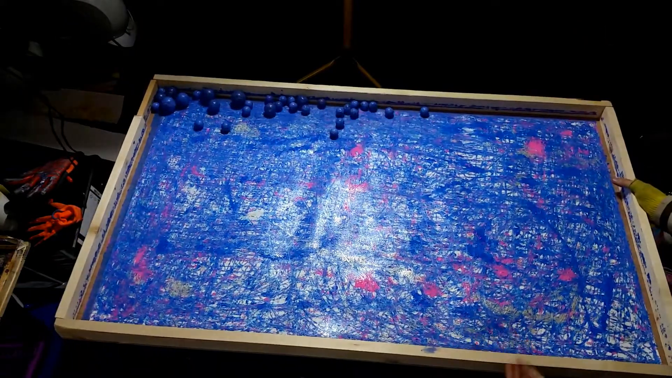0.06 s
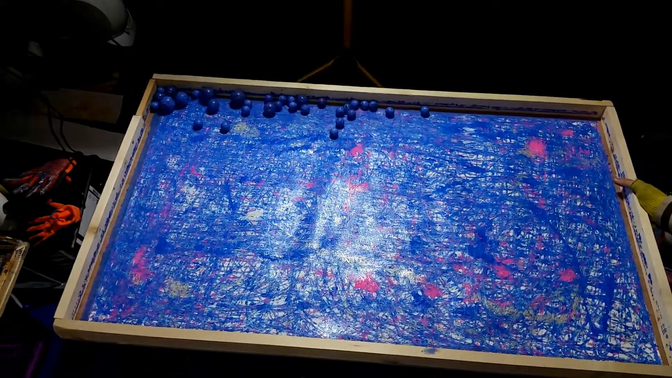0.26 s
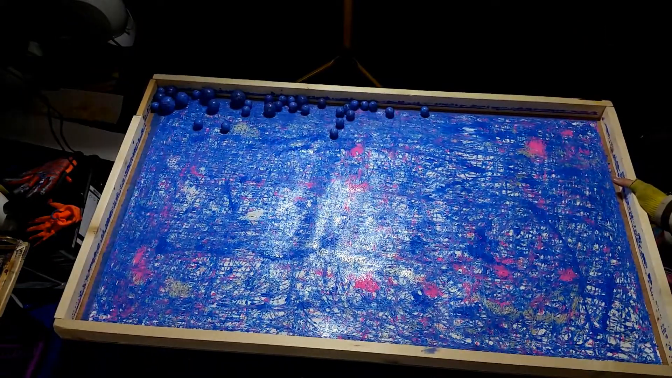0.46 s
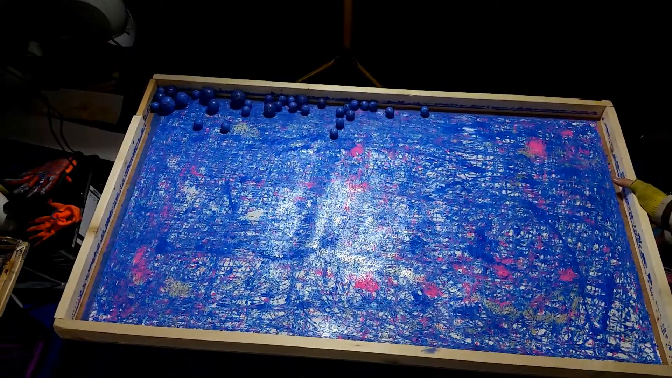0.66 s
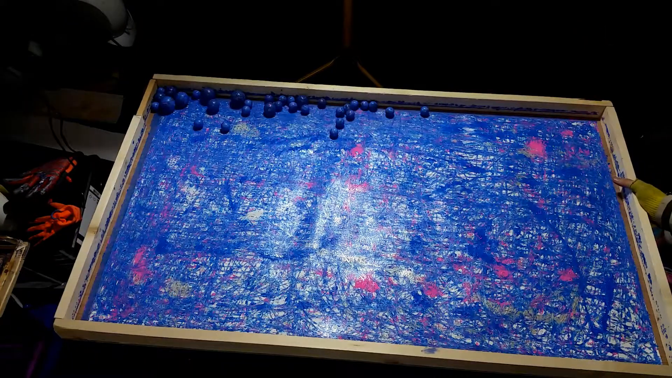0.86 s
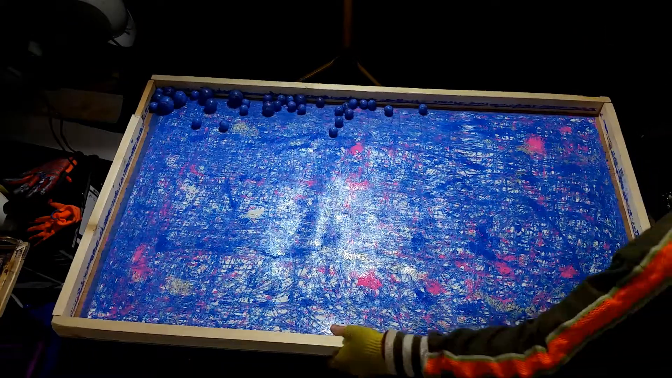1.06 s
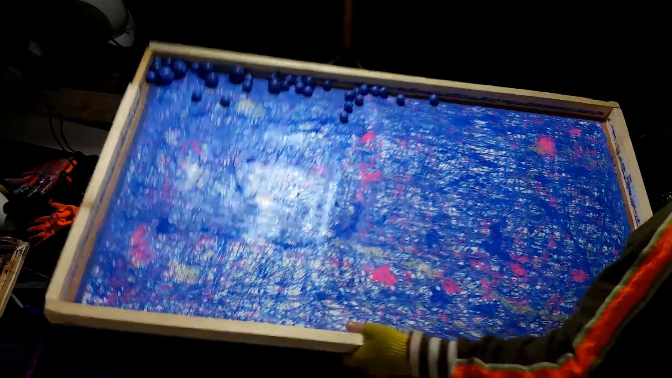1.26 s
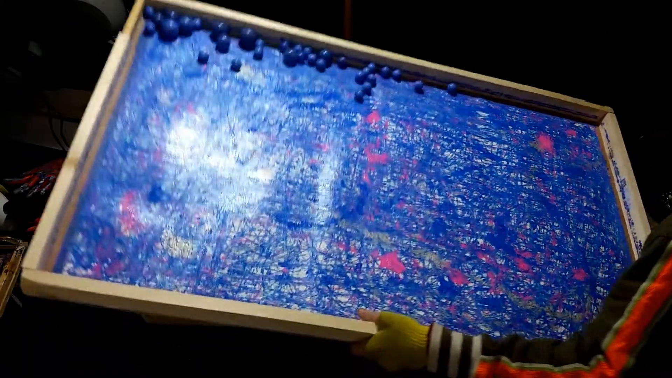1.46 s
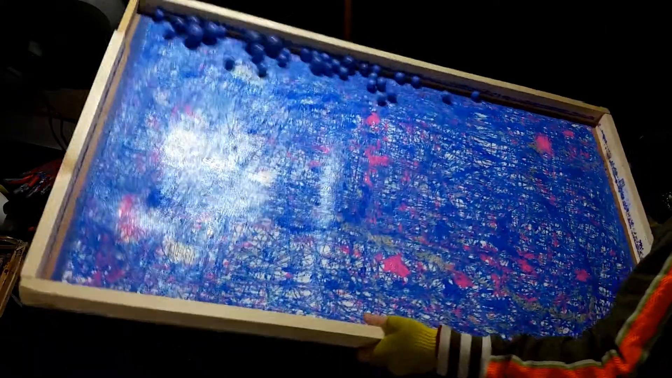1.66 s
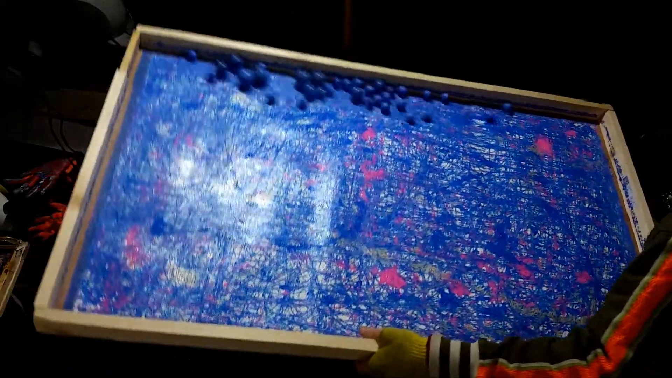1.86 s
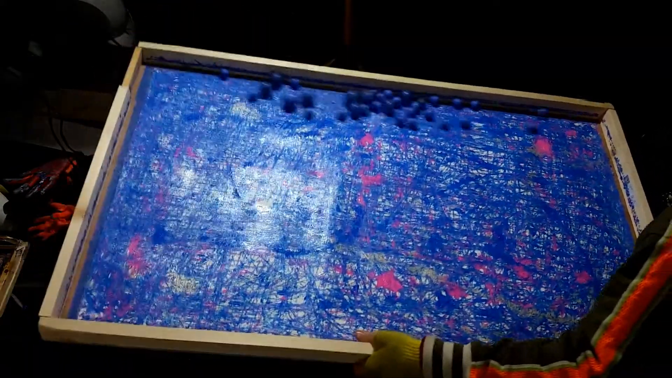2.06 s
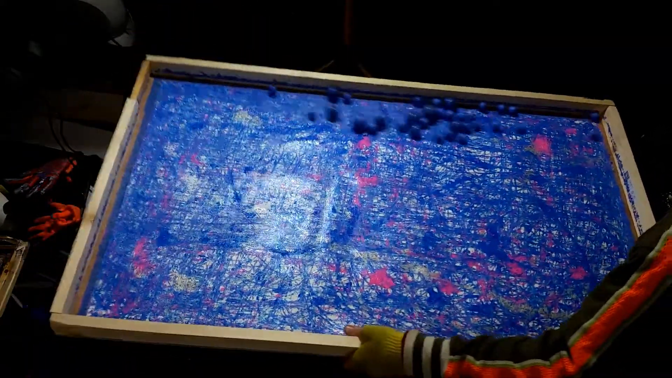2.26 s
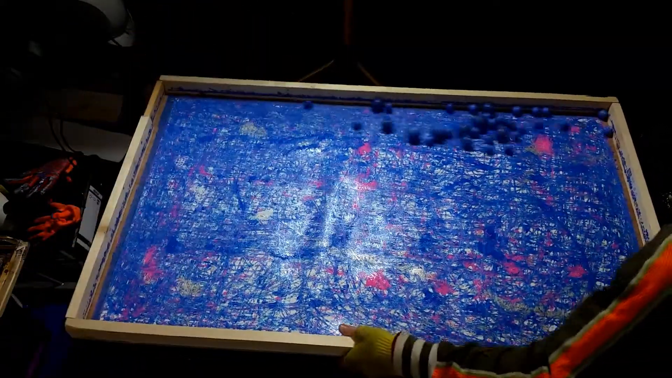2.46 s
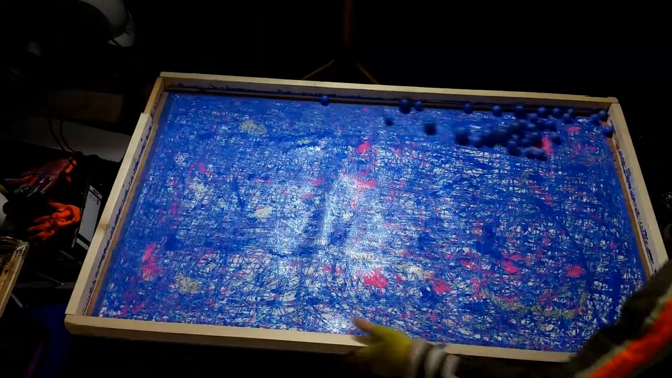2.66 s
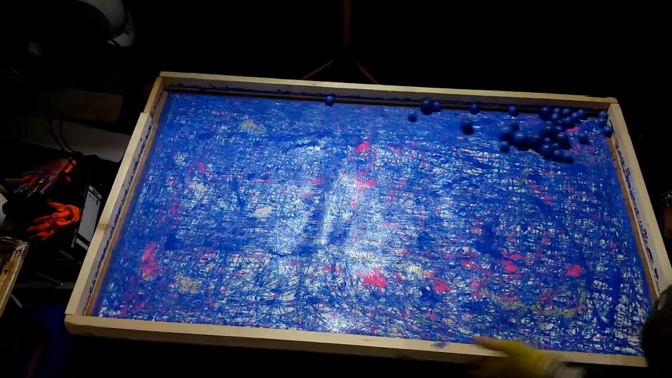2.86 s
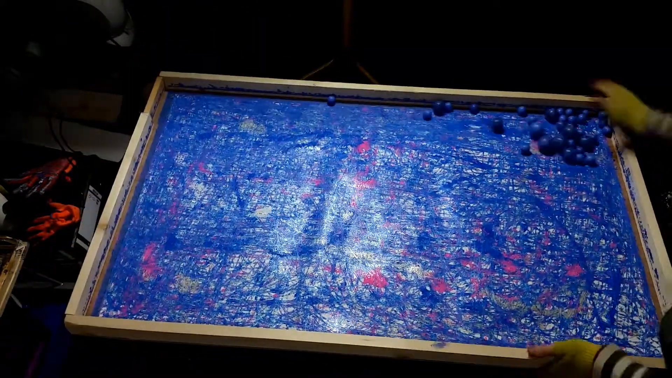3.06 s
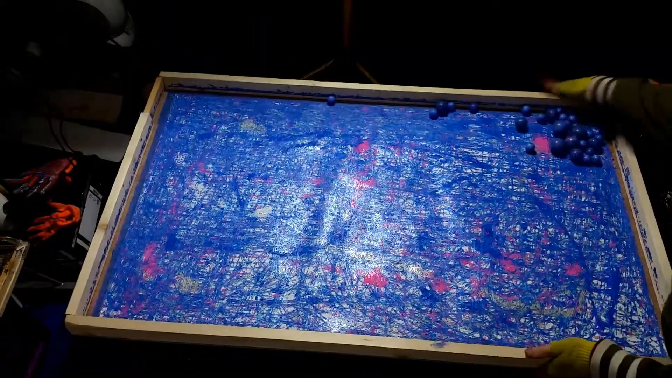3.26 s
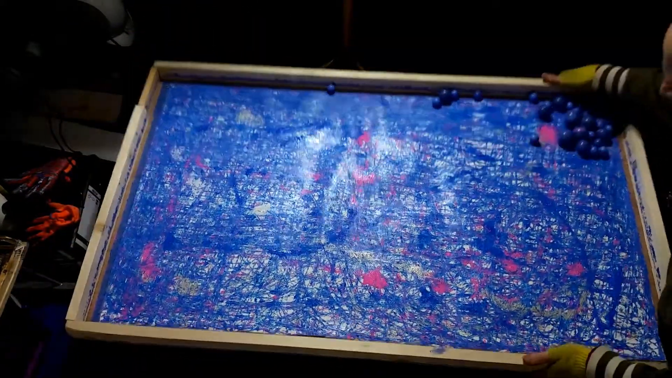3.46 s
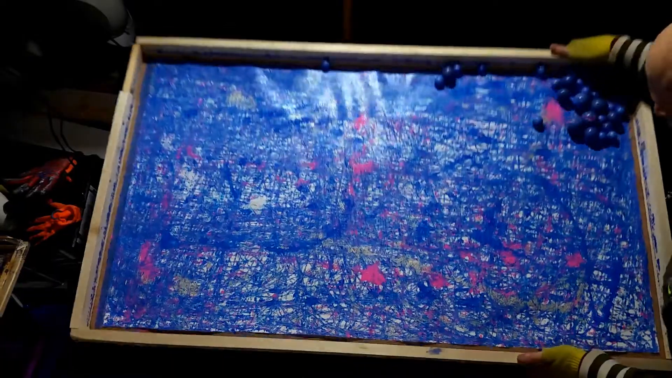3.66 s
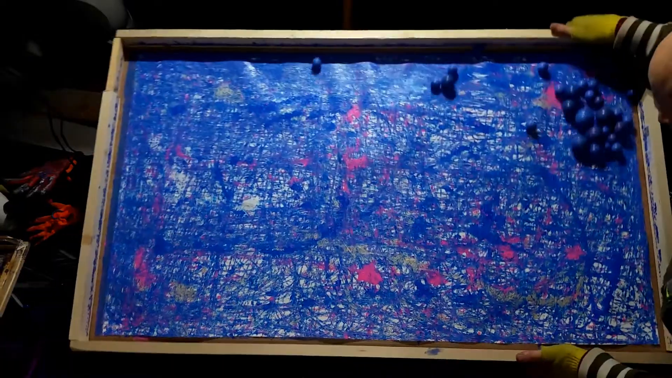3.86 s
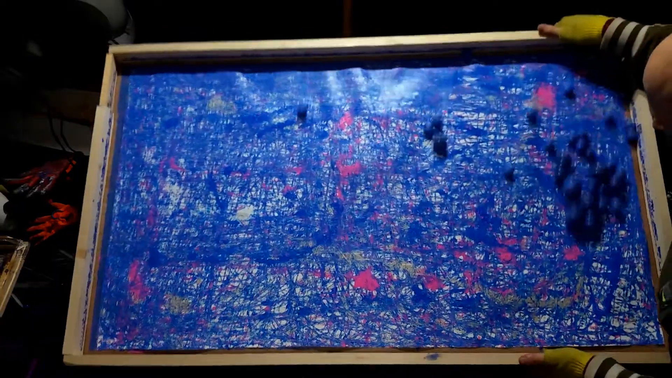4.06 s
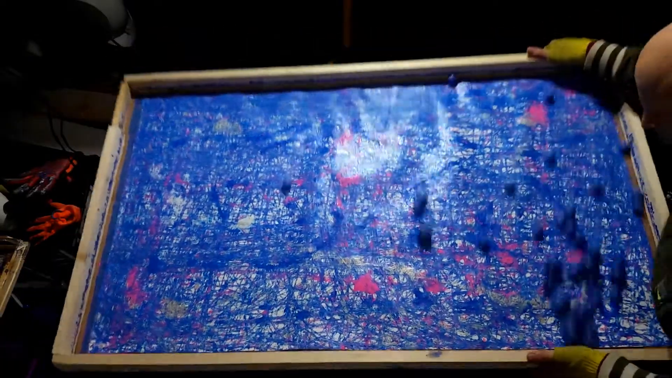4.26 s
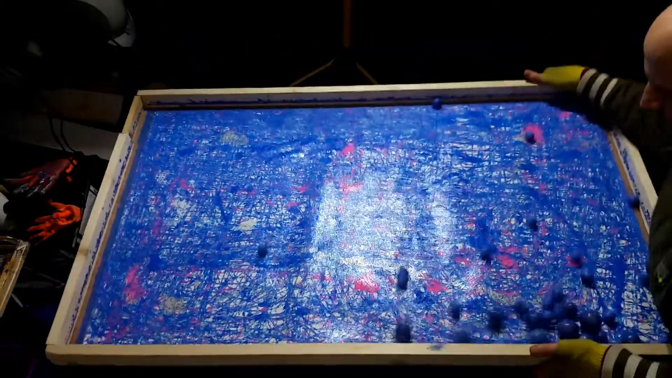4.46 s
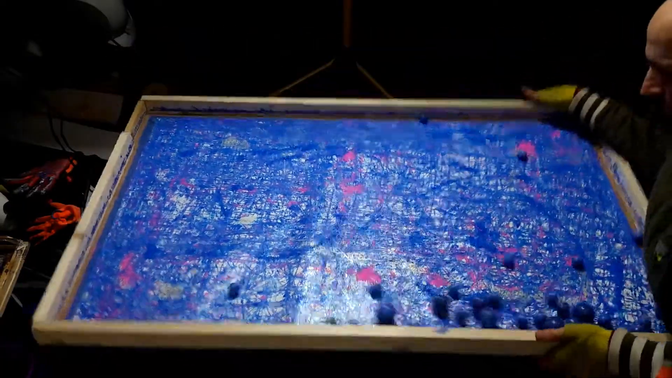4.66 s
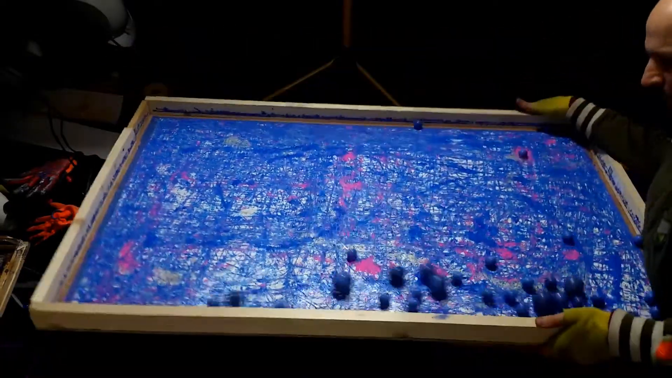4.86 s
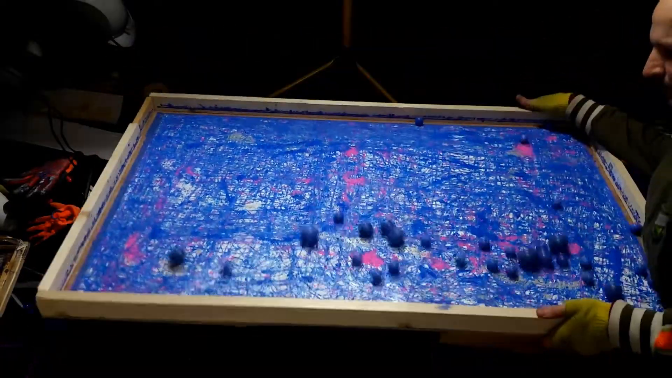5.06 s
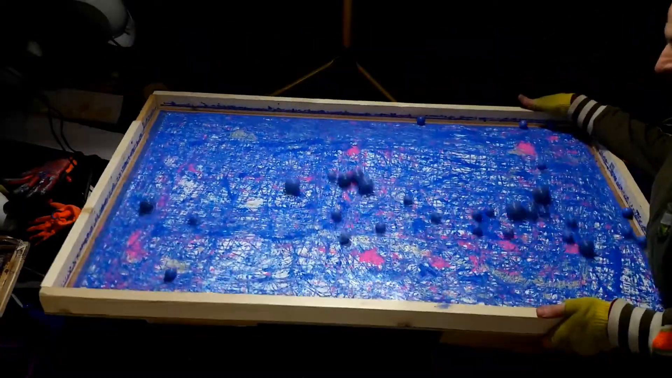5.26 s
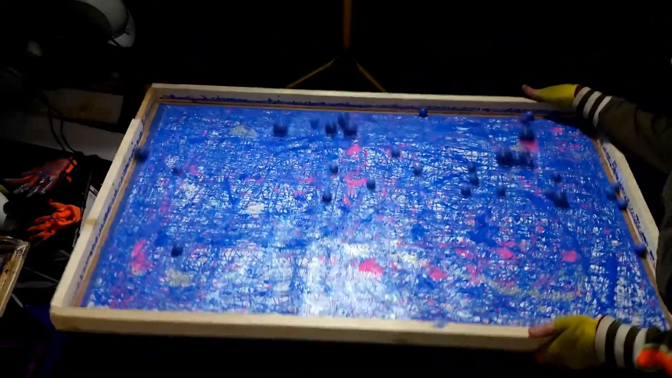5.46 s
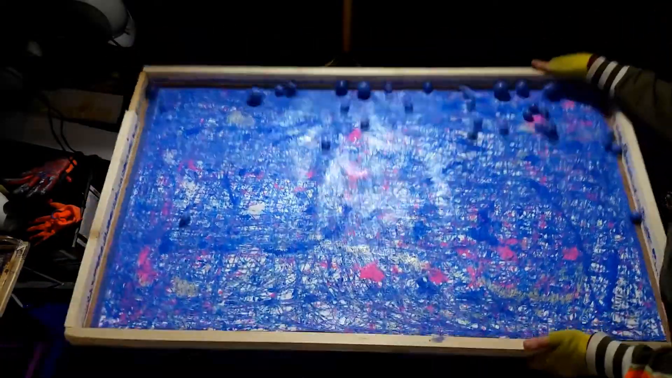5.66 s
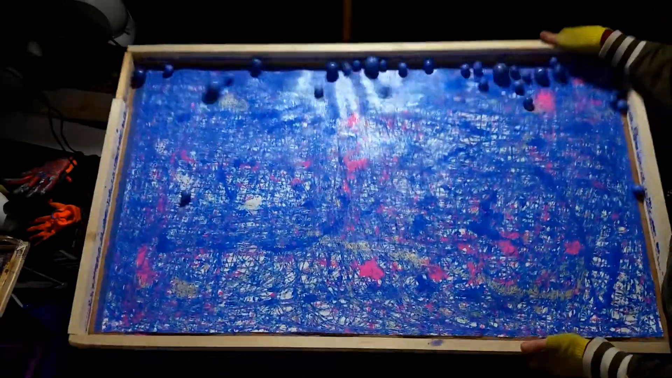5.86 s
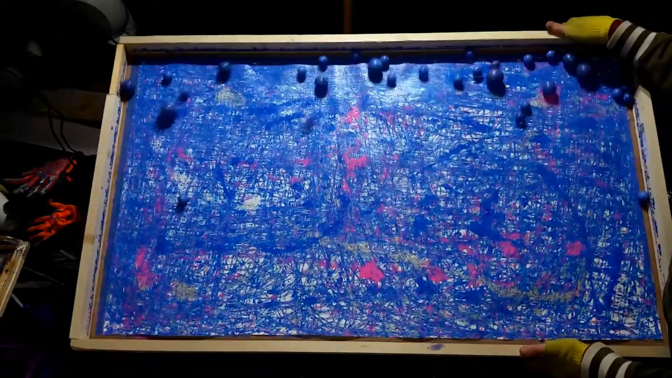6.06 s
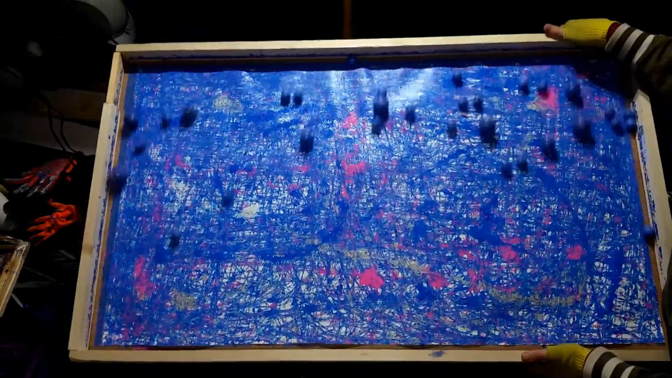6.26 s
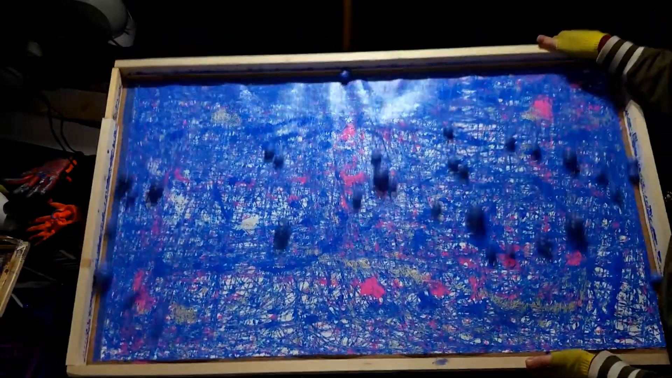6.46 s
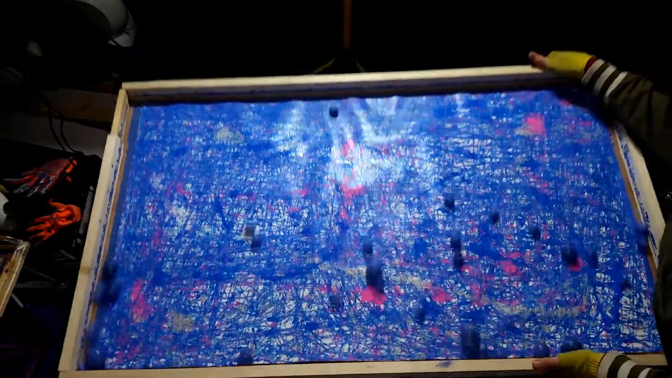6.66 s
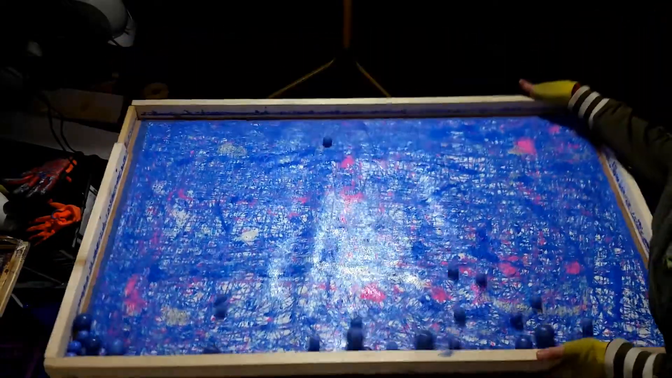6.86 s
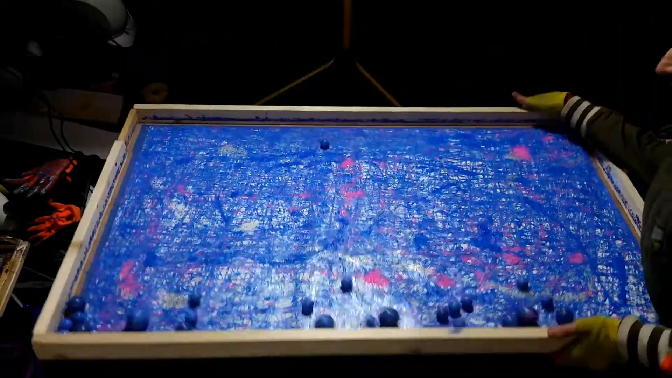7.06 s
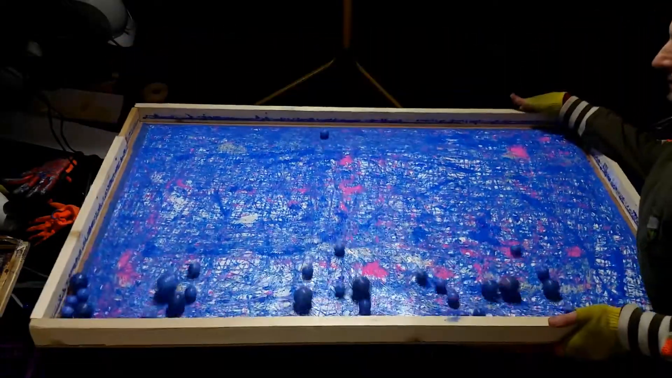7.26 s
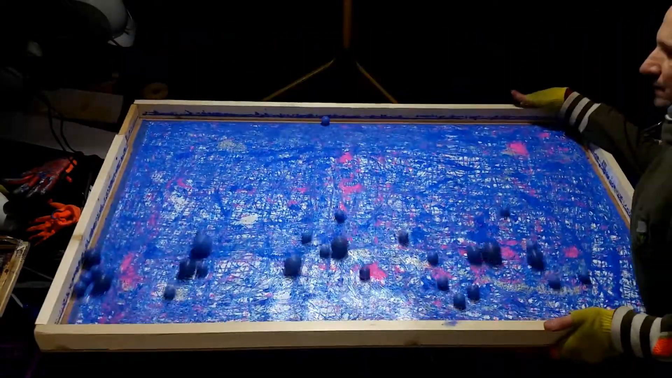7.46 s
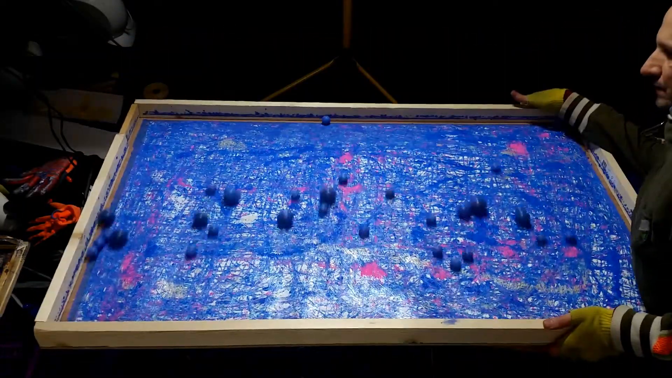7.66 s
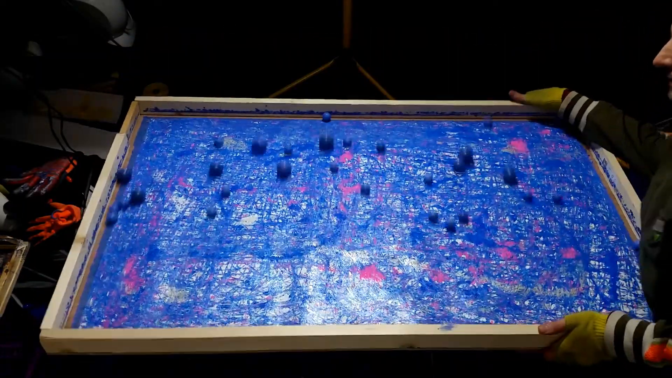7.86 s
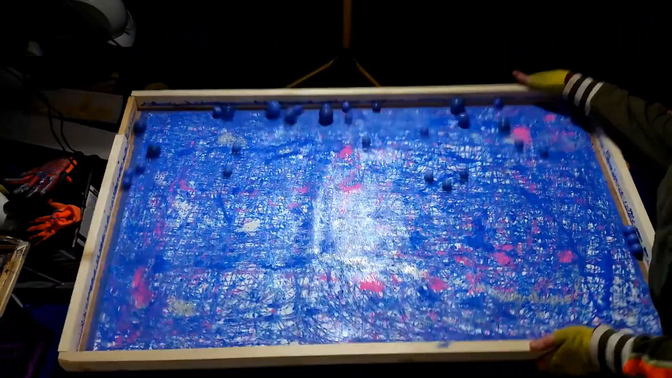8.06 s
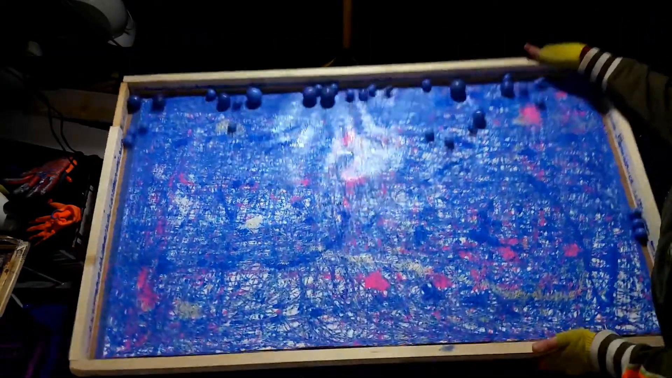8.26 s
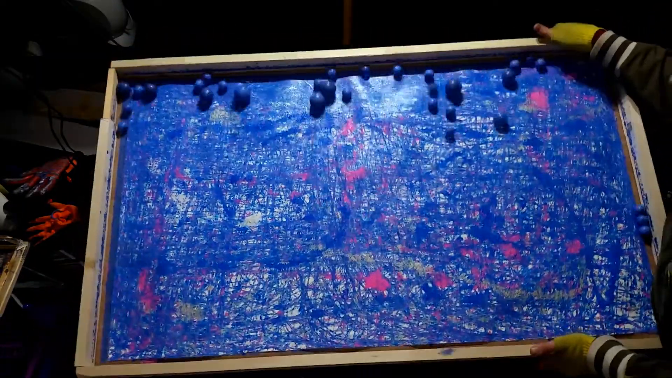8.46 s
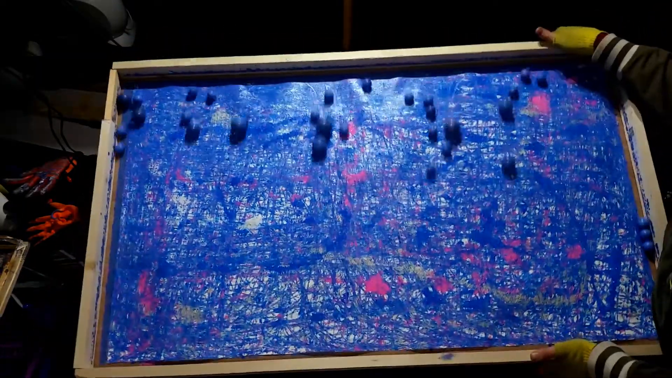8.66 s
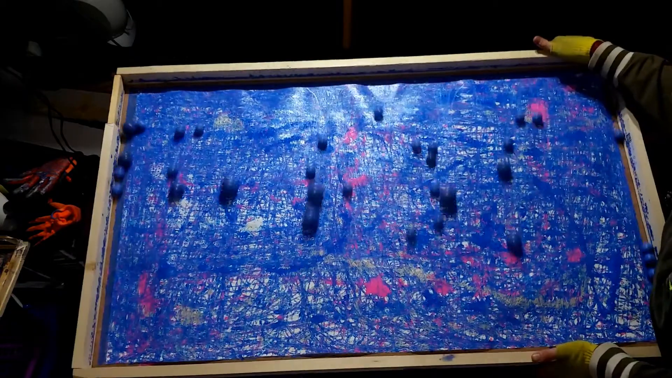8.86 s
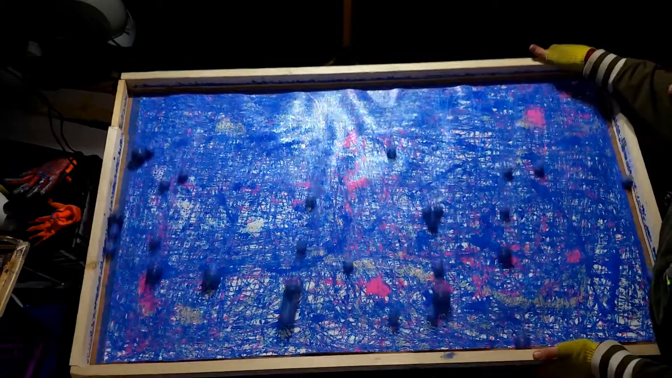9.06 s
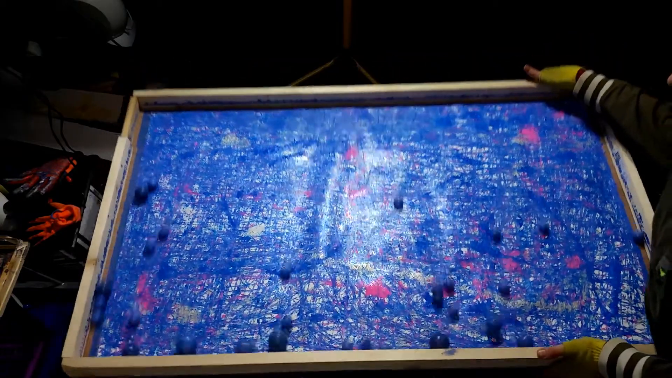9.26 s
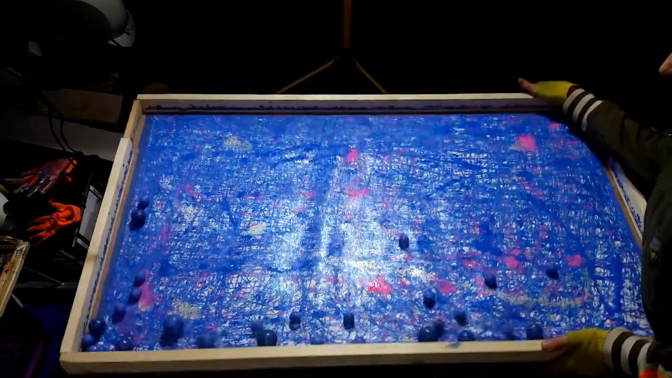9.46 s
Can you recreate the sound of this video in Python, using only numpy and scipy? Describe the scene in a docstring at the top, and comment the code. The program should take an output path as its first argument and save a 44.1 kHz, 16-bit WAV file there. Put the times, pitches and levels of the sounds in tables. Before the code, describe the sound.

Glass marbles roll in rumbling waves across a big wooden tray, clattering hard against its rails with each tilt in a small room.

```python
"""Marbles in a tipping wooden tray

Glass marbles roll over wet painted paper in a large hanging wooden tray, tipped to and fro in a small room.
Board modes jolted at random rumble; struck rail modes knock; short sine clicks clack, glass on glass.
The board's lowest mode booms now and then, mostly around the landings; once the board slaps its stop.
One microphone hears it direct and through the room's ring, over a faint hum and a band of hiss.
"""
import sys
import numpy as np
from scipy import signal
from scipy.fft import rfft, irfft
from scipy.io import wavfile

SR = 44100
rng = np.random.default_rng(int(sys.argv[2]) if len(sys.argv) > 2 else 0)


def waveform_to_disk(signal):
    """Save audio, clipped to [-1, 1], as 16-bit WAV at the path in sys.argv[1]."""
    frames = np.transpose(np.atleast_2d(signal))
    scaled = np.clip(frames, -1, 1) * 32767
    samples = np.round(scaled).astype(np.int16)
    wavfile.write(sys.argv[1], SR, samples)


N = 419832

# Levels in the tables are relative: the mix trims each layer.
# room noise spectrum: (f/Hz, level per Hz/dB)
AIR_SPECTRUM = [(12, -21), (20, 11.5), (45, -25), (81, -33.5), (116, -16.5), (248, -21), (527, -22),
                (607, -22), (873, -27), (1120, -22.5), (2390, -34), (4420, -19.5), (5530, -29.5),
                (14700, -38), (16000, -47.5)]
# rumble of the rolling crowd, swelling on each tip and sinking once it lands: (t/s, level/dB)
ROLL_LEVEL = [(0, -79.5), (1.5, -68), (1.95, -44.5), (2.28, -42), (2.6, -41), (3.1, -56.5), (3.9, -62.5),
              (4.3, -45.5), (4.74, -42), (5.12, -52), (5.67, -43.5), (5.96, -53.5), (6.25, -52),
              (6.5, -48.5), (6.89, -37.5), (7.21, -59.5), (7.45, -56), (8.2, -36), (8.46, -59),
              (8.66, -53.5), (9.3, -43.5), (9.52, -46)]
# modes of the board under the rolling marbles: (f/Hz, width/Hz, level/dB)
BOARD_MODES = [(128.3, 9.6, 1), (147, 47, -3), (179.5, 19.4, 2.5), (251, 18.3, -7), (299, 28, -5.5),
               (367, 54, -3), (420, 105, -2.5), (544, 96, -6.5), (700, 94, -9), (1000, 780, -10),
               (1680, 720, -19), (2300, 620, -68)]
# the tray jolts as it swings back and the board booms: (t/s, level/dB)
BOOM_EVENTS = [(1.05, -52.5), (2.55, -41), (4.53, -41), (4.81, -28), (5.04, -35.5), (5.7, -31), (6.47, -49),
               (6.92, -28.5), (8.19, -28), (9.44, -38)]
# the crowd piles up on a rail: (t/s, length/s, rail patter level/dB, glass patter level/dB)
LANDING_EVENTS = [(2.005, 0.37, -56, -58.5), (4.45, 0.2, -39.5, -40.5), (4.794, 0.15, -43.5, -61),
                  (5.629, 0.2, -30, -41.5), (6.452, 0.15, -44.5, -70), (6.689, 0.27, -28.5, -44),
                  (8.112, 0.2, -31.5, -41), (8.862, 0.44, -49.5, -84), (9.236, 0.33, -33, -43.5)]
# modes of the rails: (f/Hz, near rail level/dB, far rail level/dB, t60/s)
RAIL_MODES = [(183.1, -12.5, -14.5, 0.18), (275, -15.5, -13.5, 0.12), (346.5, -11, -15, 0.088),
              (421.3, -11, -7, 0.15), (560, 1, 0.5, 0.028), (643, -13, -6.5, 0.074),
              (683, -4.5, 0.5, 0.027), (725.6, -10, 0.5, 0.044), (894, -4.5, -7, 0.04),
              (985, -8.5, -3.5, 0.054), (1080, -1, 5.5, 0.025), (1215, -3.5, -2, 0.031),
              (1349, -0.5, 1, 0.018), (1522, -2, -3, 0.028), (1740, -4, -2, 0.024), (1904, -5.5, -8, 0.046),
              (2140, -3.5, -4.5, 0.022), (2460, -9.5, -37.5, 0.035), (2820, -13, -17, 0.038),
              (3370, -40, -50.5, .03)]
# spans with the marbles gathered at the far rail: (start t/s, end t/s)
FAR_RAIL_SPANS = [(3.2, 3.6), (5.25, 6.2), (7.9, 8.7)]
# hands shift on the frame: (t/s, peak level/dB, favoured f/Hz, hardness/dB)
GRIP_EVENTS = [(0.344, -52.5, 275, -5), (0.947, -51.5, 176, 1), (1.035, -54, 330, -17),
               (1.144, -50.5, 185, -8), (1.218, -47, 248, -2), (1.279, -54, 196, 22)]
# marble on rail: (t/s, peak level/dB, f/Hz favoured by the spot struck, hardness/dB)
KNOCK_EVENTS = [(1.544, -42, 763, -1.5), (1.753, -31, 531, -32), (1.849, -22.5, 710, 16.5),
                (1.994, -28, 1080, 31), (2.086, -29.5, 344, -21), (2.115, -32, 447, 16),
                (2.187, -28.5, 444, 14), (2.272, -28, 1153, 22), (2.37, -30, 479, 9), (2.439, -28, 400, -1),
                (2.572, -27.5, 355, 0.5), (2.674, -34.5, 353, 20), (2.713, -33, 720, -16),
                (3.009, -42.5, 406, 2), (3.298, -32.5, 752, -9), (4.143, -33.5, 930, -17),
                (4.403, -7.5, 542, 3), (4.428, -18.5, 914, 10), (4.475, -9.5, 690, 7),
                (4.529, -22, 572, -1), (4.609, -10.5, 985, 27.5), (4.717, -27, 985, -1),
                (4.804, -16, 356, 3), (4.879, -34, 398, -12), (4.999, -18.5, 490, -4),
                (5.039, -30.5, 1000, -1), (5.333, -22, 700, -1.5), (5.48, -37, 1180, -12),
                (5.527, -23.5, 910, 0), (5.571, -25.5, 700, -1), (5.597, -15, 725, 1), (5.616, -7, 664, 1),
                (5.654, -8, 646, -6), (5.758, -14, 700, 4), (5.789, -24, 432, -11), (5.857, -17.5, 640, 16),
                (5.924, -30, 700, -1), (5.985, -24, 686, -2), (6.049, -28.5, 700, 19),
                (6.382, -19.5, 337, -9.5), (6.465, -28, 410, -3), (6.487, -29.5, 880, 13),
                (6.651, -16, 523, 1), (6.693, -12, 420, 18), (6.725, -7, 980, 21), (6.775, -5, 560, 4.5),
                (6.809, -11.5, 560, 8.5), (6.896, -16.5, 560, 17), (6.924, -12, 976, 25.5),
                (6.989, -17, 553, 3.5), (7.087, -22, 1290, -5.5), (7.129, -32.5, 1000, 2),
                (7.449, -39, 340, -29), (7.493, -29, 835, -3.5), (7.993, -18.5, 700, 8.5),
                (8.048, -17.5, 710, -25), (8.086, -9, 420, 9), (8.117, -9.5, 376, -1.5),
                (8.179, -10, 395, -1), (8.197, -14.5, 390, 4), (8.24, -13, 1040, -13),
                (8.331, -22, 360, 16), (8.367, -22.5, 630, 1), (8.409, -22.5, 906, -5.5),
                (8.837, -34, 1220, -14), (8.891, -32.5, 346, 1), (9.079, -32.5, 430, -8),
                (9.189, -13.5, 1220, -9), (9.241, -7.5, 560, 4.5), (9.265, -7, 1010, -4),
                (9.334, -11.5, 624, -7), (9.373, -13.5, 563, 3), (9.489, -17.5, 1154, 5)]
# marble on marble: (t/s, level/dB, f/Hz)
CLACK_EVENTS = [(1.579, -42, 5120), (1.719, -35.5, 4700), (1.8058, -35, 4840), (1.908, -31, 6600),
                (2.126, -30, 5360), (2.452, -36, 2980), (2.65, -37, 5650), (2.781, -35, 4930),
                (2.9655, -38.5, 4160), (3.005, -37, 4170), (3.2926, -34, 6240), (3.3807, -44, 5550),
                (3.425, -43.5, 3040), (3.8168, -42.5, 3660), (4.0122, -43, 3700), (4.2, -44, 4800),
                (4.4051, -21, 4200), (4.427, -21.5, 8550), (4.444, -18.5, 9700), (4.468, -18, 9050),
                (4.606, -29, 3480), (4.53, -35, 11000), (4.597, -26, 8900), (4.706, -24, 11000),
                (4.804, -26.5, 3180), (4.9997, -33.5, 2840), (5.0786, -42.5, 7100), (5.1493, -44.5, 5270),
                (5.352, -37, 6250), (5.459, -39, 3540), (5.539, -36, 5010), (5.5693, -32, 8350),
                (5.6143, -15.5, 4950), (5.685, -15, 2960), (5.8106, -50, 7000), (5.897, -35, 8500),
                (5.9724, -38, 9500), (6.052, -41, 4030), (6.41, -43.5, 6560), (6.434, -37, 8350),
                (6.4955, -34.5, 9010), (6.645, -32.5, 6560), (6.693, -24, 3250), (6.7149, -14.5, 3370),
                (6.788, -25, 6500), (6.8862, -17.5, 3050), (6.9208, -11.5, 2690), (7.0442, -30.5, 8800),
                (7.0696, -26.5, 5250), (7.202, -30, 10400), (7.991, -46, 3140), (8.0474, -7.5, 3230),
                (8.1409, -28, 3800), (8.192, -28, 6000), (8.215, -20, 10000), (8.3006, -31, 8880),
                (8.4255, -27.5, 6500), (8.6021, -34.5, 7660), (8.641, -37, 4470), (9.2549, -15.5, 3300),
                (9.315, -25, 8400), (9.465, -25, 8540), (9.491, -25, 2940)]
# a marble drops off a ridge onto the board: (t/s, peak level/dB)
BUMP_EVENTS = [(1.856, -23.5), (2.237, -24.5), (2.294, -21.5), (2.443, -20), (2.517, -35), (4.411, -25),
               (4.609, -18.5), (4.808, -10.5), (5.276, -28.5), (6.379, -30), (6.651, -27), (6.806, -18),
               (6.894, -27), (8.12, -26), (8.166, -20), (8.331, -24.5), (8.734, -29.5), (9.074, -24)]
# decay of the room's tail: (f/Hz, t60/s)
ROOM_DECAY = [(200, 0.3), (1000, 0.38), (4000, 0.2), (12000, 0.31)]

AIR_DB = -62
HUM_HZ, HUM_DB = 118, -74
BRIGHT_AT_DB, BRIGHT_PER_DB = -46, 0.1892   # louder rolling is brighter: dB an octave per dB above this level
LANDING_BRIGHT_DB = 2.5   # dB an octave added while the crowd lands
LUMPY_DB = 2.5   # spread of the surges as marbles cross ridges of paint
BOOM_HZ, BOOM_WIDTH_HZ = 51, 11
BOOM_RISE_DB_PER_S, BOOM_FALL_DB_PER_S, BOOM_REST_DB = 404, 72, -61.5
GATHER_DB_PER_S, SCATTER_DB_PER_S = 501, 138
RAIL_UNDER_ROLL_DB, GLASS_UNDER_ROLL_DB, GLASS_REST_DB = -17, -25, -83   # stragglers between landings
KNOCK_RISE_S = 0.003
CRACK_DB, CRACK_T60_S, CRACK_HZ = -3, 0.077, (810, 3140)
BITE_DB, BITE_HZ, BITE_PER_HARD_DB = -14.5, (2240, 4160), 1.68   # shares the crack's t60
# hard clacks pass down a row of five more marbles; chatter is quieter for clacks below CHATTER_ABOVE_DB
CHATTER_GAP_S, CHATTER_DB, CHATTER_LOSS_DB = 0.006, -0.5, 4.6
CHATTER_SPREAD_DB, CHATTER_ABOVE_DB, CHATTER_SOFT_DB_PER_DB = 9, -35.5, 1.72
RATTLE_S, RATTLE_DB, RATTLE_GAP_S, RATTLE_LOSS_DB = 4.812, -12, 0.0165, 1
ROOM_DB, EARLY_DB, EARLY_T60_S, EARLY_RISE_S = 13, 10, 0.12, 0.0041   # dB against the direct sound
GLASS_TOP_HZ, GLASS_DIRECT_DB, WOOD_WET_DB = 11300, -6.5, 5.5
WIDE_DB, WIDE_HZ = -13, 9500
OVERLOAD_TOP = 0.35   # full scale is 1
CUTOFF_HZ = 16000


def amp(db):
    """Decibels to amplitude."""
    return 10 ** (np.asarray(db) / 20)


def rms_one(x):
    """Scale to an RMS of 1."""
    return x / np.sqrt(np.mean(x ** 2) + 1e-20)


def at_hz(points, hz):
    """Read a curve of (f/Hz, value) along log frequency."""
    point_hz, values = np.transpose(points)
    return np.interp(np.log(hz), np.log(point_hz), values)


def convolve(x, response):
    """Convolve and trim to the scene's length."""
    return signal.fftconvolve(x, response)[:N]


def band_pass(x, edges_hz):
    """Keep one band of x, between two edges in Hz."""
    return signal.sosfilt(signal.butter(2, edges_hz, "band", fs=SR, output="sos"), x)


def drift(rate_hz):
    """Smooth chance of RMS 1: noise through two equal low-pass poles, at a fortieth of SR."""
    r = np.exp(-80 * np.pi * rate_hz / SR)
    noise = rng.standard_normal(N // 40 + 2002)
    slow = signal.lfilter([1], [1, -2 * r, r * r], noise)[2000:]   # drop the filter's start
    return np.interp(np.arange(N) / 40, np.arange(len(slow)), rms_one(slow))


def resonance(x, hz, width_hz):
    """One mode as a two-pole resonance, gain about 1 on top."""
    r = np.exp(-np.pi * width_hz / SR)
    poles = [1, -2 * r * np.cos(2 * np.pi * hz / SR), r * r]
    return signal.lfilter((1 - r * r) / 2 * np.array([1, 0, -1]), poles, x)


def patter(per_s, spread_db):
    """Small contacts at random moments, of either sign; a spread above 0 makes them uneven."""
    sizes = amp(spread_db * np.minimum(rng.exponential(1, N), 4))
    signs = rng.choice([-1, 1], N)
    return sizes * signs * (rng.random(N) < per_s / SR)


def place(times, sounds):
    """Start each row of sounds at its time in seconds."""
    out = np.zeros(N + SR)
    for s, sound in zip(times, sounds):
        start = round(s * SR)
        out[start:start + len(sound)] += sound
    return out[:N]


def swells(starts, lengths, tops_db, rise_db_per_s, fall_db_per_s):
    """Level in dB: each swell rises, holds for its length and falls; the loudest counts."""
    t, out = np.arange(N) / SR, np.full(N, -200.)
    for s, length, db in zip(starts, lengths, tops_db):
        rise_db = rise_db_per_s * np.maximum(s - t, 0)
        fall_db = fall_db_per_s * np.maximum(t - s - length, 0)
        out = np.maximum(out, db - rise_db - fall_db)
    return out


def air():
    """Steady room noise with a hiss band near 4 kHz, and a wavering hum."""
    hz = np.maximum(np.fft.rfftfreq(N, 1 / SR), 1)
    spectrum = rfft(rng.standard_normal(N)) * amp(at_hz(AIR_SPECTRUM, hz))
    noise = rms_one(irfft(spectrum, N))
    tone = np.sqrt(2) * np.sin(2 * np.pi * HUM_HZ * np.arange(N) / SR)
    hum = amp(HUM_DB + 5.0 * drift(2.2)) * tone
    return amp(AIR_DB) * noise + hum


def rolling(level_db, bright_db):
    """Paint lumps and paper grain jolt the board; faster marbles reach its upper modes."""
    jolts = rms_one(patter(900, spread_db=0.0))
    out = 0
    for k, (hz, width_hz, db) in enumerate(BOARD_MODES):
        wander_db = 1.8 * drift(6.8)   # marbles cross nodes and bellies of each mode
        gain = amp(db + wander_db + bright_db * np.log2(hz / 180))
        out = out + (-1) ** k * gain * rms_one(resonance(jolts, hz, width_hz))
    return amp(level_db + LUMPY_DB * drift(15.0)) * out


def boom(level_db):
    """The board's lowest bending mode, shaken at random: noise through two resonances."""
    shaken = resonance(rng.standard_normal(N), BOOM_HZ, 2 * BOOM_WIDTH_HZ)
    return amp(level_db) * rms_one(resonance(shaken, BOOM_HZ, BOOM_WIDTH_HZ))


def at_far_rail(s):
    """True while the marbles are at the far rail."""
    return sum((s > a) & (s < b) for a, b in FAR_RAIL_SPANS) > 0


def rail_rings():
    """One decaying sine for each rail mode."""
    hz, near_db, far_db, t60 = np.transpose(RAIL_MODES)[:, :, None]
    t = np.arange(SR // 4) / SR
    return amp(-60 * t / t60) * np.sin(2 * np.pi * hz * t)


def rail_patter(level_db):
    """The crowd of lesser knocks, each ringing a third of the rail's modes."""
    blows, dealt = patter(250, spread_db=8.5), rng.integers(0, 3, N)
    far = at_far_rail(np.arange(N) / SR)
    out = 0
    for k, (ring, (hz, near_db, far_db, t60)) in enumerate(zip(rail_rings(), RAIL_MODES)):
        gain = np.where(far, amp(far_db), amp(near_db))
        out = out + convolve(blows * (dealt == k % 3) * gain, ring)
    return amp(level_db - 6.5) * rms_one(out)


def glass_click(hz, cycles):
    """A short hard contact builds over part of a cycle, then falls 60 dB in a few cycles."""
    t = np.arange(SR // 200) / SR
    return amp(-60 * t * hz / cycles) * (1 - np.exp(-4.0 * hz * t)) * np.sin(2 * np.pi * hz * t)


def glass_patter(level_db):
    """The crowd of lesser clacks, dealt among clicks of six pitches."""
    touches, dealt = patter(600, spread_db=7.0), rng.integers(0, 6, N)
    crowd = 0
    for k, hz in enumerate(np.geomspace(3500, 11000, 6)):
        crowd = crowd + convolve(touches * (dealt == k), glass_click(hz, 2.95))
    return amp(level_db + 2.0) * rms_one(crowd)


def knocks(rows):
    """The spot struck favours the modes near it; a harder blow rings the upper modes more and cracks."""
    s, db, spot_hz, hard_db = np.transpose(rows)[:, :, None]
    hz, near_db, far_db, t60 = np.transpose(RAIL_MODES)
    favour_db = 15.5 * np.exp(-.5 * (np.log2(hz / spot_hz) / 0.058) ** 2)
    upper_db = hard_db * np.clip(np.log2(hz / 700), 0, 1)   # in full from 1400 Hz up
    mode_db = np.where(at_far_rail(s), far_db, near_db) + favour_db + upper_db
    chance = rng.standard_normal((len(s), 2, len(hz)))
    sounds = (amp(mode_db + 4.42 * chance[:, 0]) * np.sign(chance[:, 1])) @ rail_rings()
    # the many close upper modes of the wood blur into a short burst of noise
    t = np.arange(sounds.shape[1]) / SR
    decay_db = -60 * t / CRACK_T60_S
    crack = band_pass(rng.standard_normal(sounds.shape), CRACK_HZ)
    sounds += amp(CRACK_DB + hard_db + decay_db) * crack
    bite = band_pass(rng.standard_normal(sounds.shape), BITE_HZ)   # hard blows bite higher still
    sounds += amp(BITE_DB + BITE_PER_HARD_DB * hard_db + decay_db) * bite
    sounds *= np.minimum(t / KNOCK_RISE_S, 1)   # the rail takes a moment to speak
    peaks = np.abs(sounds).max(axis=1, keepdims=True)
    return place(s[:, 0], amp(db - 3.5) * sounds / peaks)


def clacks():
    """Single clacks of two clicks each, the hard ones running on through the neighbours."""
    s, db, hz = np.transpose(CLACK_EVENTS)[:, :, None]
    chance = rng.random((len(s), 6, 3))
    soft_db = CHATTER_SOFT_DB_PER_DB * np.minimum(db - CHATTER_ABOVE_DB, 0)
    out = 0
    for k in range(6):   # 0 is the clack itself, the rest its chatter
        late, tone, size = np.moveaxis(chance[:, k], 1, 0)[:, :, None] * (k > 0)
        chatter_db = CHATTER_DB - CHATTER_LOSS_DB * k - CHATTER_SPREAD_DB * size + soft_db
        less_db = (k > 0) * chatter_db
        upper_click = glass_click(7200 * 2 ** (0.53 * tone), 3.0 + 1.0 * tone)
        click = glass_click(hz, 4.5) + 1.63 * upper_click
        times = s + CHATTER_GAP_S * (k + late)
        out = out + place(times[:, 0], amp(db + 15 + less_db) * click)
    return out


def bumps():
    """A soft drop rings the board's low modes, each with a random sign."""
    s, db = np.transpose(BUMP_EVENTS)
    hz, width_hz, mode_db = np.transpose(BOARD_MODES[:7])[:, :, None]
    t = np.arange(SR // 4) / SR
    gain = amp(mode_db + 3.8 * np.log2(hz / 180))
    rings = gain * np.exp(-.6 * np.pi * width_hz * t) * np.sin(2 * np.pi * hz * t)
    sounds = rng.choice([-1, 1], (len(s), len(rings))) @ rings
    peaks = np.abs(sounds).max(axis=1, keepdims=True)
    return place(s, amp(db - 1.5)[:, None] * sounds / peaks)


def rattle():
    """The board slaps its stop four times: soft pulses with a slow rebound, evenly spaced and dying."""
    k = np.arange(4)
    t = np.arange(SR // 50) / SR
    push = np.exp(-.5 * ((t - .003) / 0.0006) ** 2)
    rebound = 0.15 * np.exp(-.5 * ((t - .007) / 0.0036) ** 2)
    levels = amp(RATTLE_DB - RATTLE_LOSS_DB * k)[:, None]
    return place(RATTLE_S + RATTLE_GAP_S * k, levels * (push - rebound))


def room_response():
    """Direct sound, dense echoes off tray and near walls, and a tail dying by band; energy 1."""
    t = np.arange(SR // 2) / SR
    tail = 0
    for low in 60 * 2. ** np.arange(0, 8.1):   # octave bands
        noise = band_pass(rng.standard_normal(len(t)), [low, min(2 * low, .45 * SR)])
        tail = tail + noise * amp(-60 * t / at_hz(ROOM_DECAY, 1.4 * low))
    early = rng.standard_normal(len(t)) * amp(-60 * t / EARLY_T60_S) * np.minimum(t / EARLY_RISE_S, 1)
    response = amp(ROOM_DB) * tail / np.linalg.norm(tail) + amp(EARLY_DB) * early / np.linalg.norm(early)
    response[0] = 1
    return response / np.linalg.norm(response)


def scene():
    """Rolling and landings set the levels; struck wood and glass also ring the room."""
    roll_db = np.interp(np.arange(N) / SR, *np.transpose(ROLL_LEVEL))
    s, length, rail_top_db, glass_top_db = np.transpose(LANDING_EVENTS)
    pace = GATHER_DB_PER_S, SCATTER_DB_PER_S
    landing = amp(swells(s, length, 0 * s, *pace))   # 1 while the crowd lands
    bright_db = BRIGHT_PER_DB * (roll_db - BRIGHT_AT_DB) + LANDING_BRIGHT_DB * landing
    rail_db = np.maximum(swells(s, length, rail_top_db, *pace), roll_db + RAIL_UNDER_ROLL_DB)
    glass_db = np.maximum(swells(s, length, glass_top_db, *pace), roll_db + GLASS_UNDER_ROLL_DB)
    glass_db = np.maximum(glass_db, GLASS_REST_DB)
    s, db = np.transpose(BOOM_EVENTS)
    boom_db = np.maximum(swells(s, 0 * s, db, BOOM_RISE_DB_PER_S, BOOM_FALL_DB_PER_S), BOOM_REST_DB)

    board = rolling(roll_db, bright_db) + boom(boom_db) + bumps() + rattle()
    wood = rail_patter(rail_db) + knocks(GRIP_EVENTS) + knocks(KNOCK_EVENTS)
    glass = glass_patter(glass_db) + clacks()
    # the room soaks up the top of the glass
    dulled = signal.sosfilt(signal.butter(4, GLASS_TOP_HZ, fs=SR, output="sos"), glass)
    # the big tray throws more sound straight at the microphone than the small marbles do
    direct = wood + amp(GLASS_DIRECT_DB) * glass
    room = convolve(amp(WOOD_WET_DB) * wood + dulled, room_response())
    mono = air() + board + direct + room
    return np.array([mono, mono])


def record(dry):
    """The top treble differs a little between channels, by a random drift; peaks are rounded; the top is cut."""
    treble = signal.sosfilt(signal.butter(4, WIDE_HZ, "high", fs=SR, output="sos"), dry[0])
    wide = dry + amp(WIDE_DB) * drift(150.) * treble * [[1], [-1]]
    rounded = OVERLOAD_TOP * np.tanh(wide / OVERLOAD_TOP)
    top_cut = signal.cheby2(12, 70, CUTOFF_HZ * 1.04, fs=SR, output="sos")   # 70 dB down just above the cutoff
    return signal.sosfilt(top_cut, rounded)


dry = scene()
out = record(dry)
waveform_to_disk(out)
```